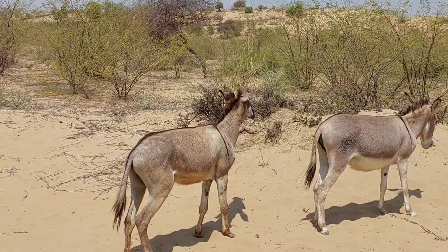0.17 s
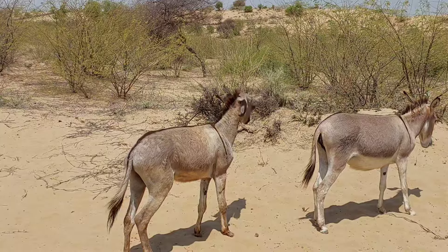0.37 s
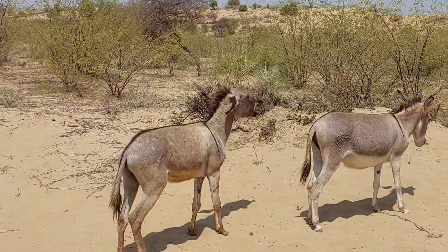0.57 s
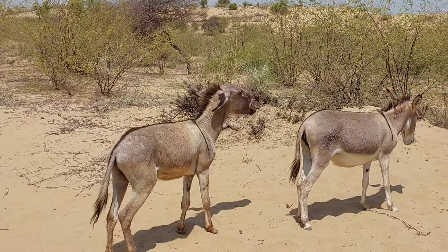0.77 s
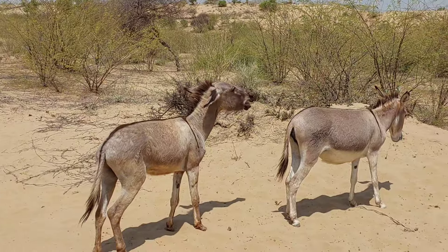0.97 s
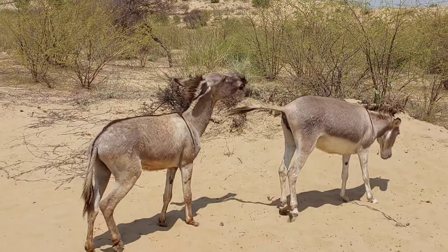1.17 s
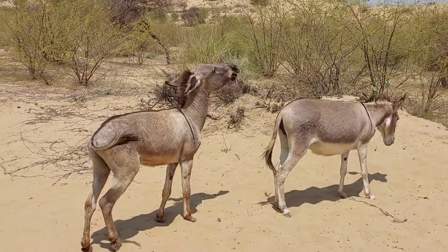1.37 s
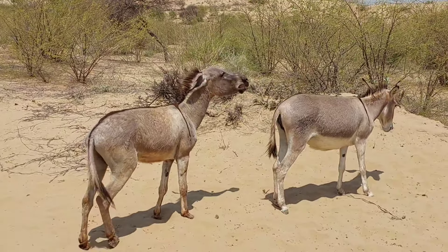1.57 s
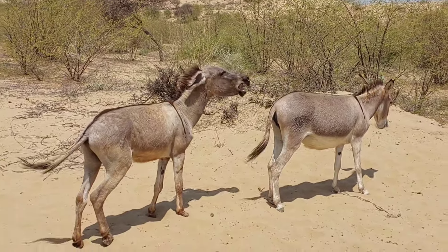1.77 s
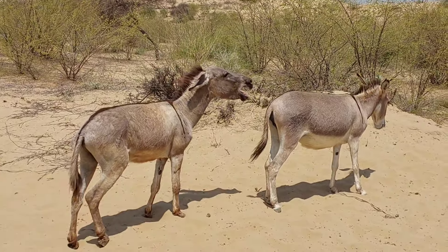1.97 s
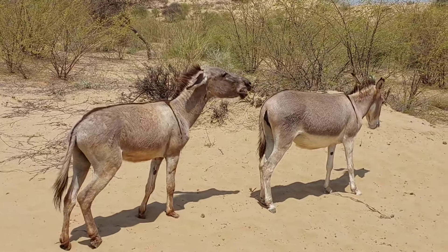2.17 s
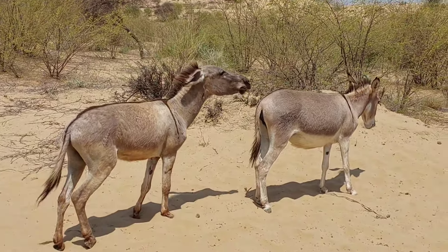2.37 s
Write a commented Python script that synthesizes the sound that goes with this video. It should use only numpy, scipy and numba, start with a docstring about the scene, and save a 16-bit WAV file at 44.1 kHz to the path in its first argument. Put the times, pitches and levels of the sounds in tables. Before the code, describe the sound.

Three quick donkey hee-haws outdoors, each squealing on the in-breath then barking low and harsh; the middle one is loudest and breaks into a rattle. Dry open scrub, very faint echo, gusty stereo microphone, slight high hiss.

```python
"""A donkey brays on open sand: three rounds of a gasp, a squealing in-drawn "hee" and a rough "haw".
Each gasp is noise through mouth resonances; each hee a hoarse whistle with overtones over rushing air.
Two faint moans rise into the first haw. Haws are uneven throat pulses; the second breaks into a rattling
growl, and the third, after one more gasp, rattles out. Throughout, scrub gives a faint echo and wind
buffets the microphone; a faint, high hiss comes and goes, mostly on the right."""
import sys
import numpy as np
from scipy import signal
from scipy.fft import rfft, irfft
from scipy.io import wavfile
from scipy.ndimage import uniform_filter1d
from numba import njit

SR = 44100
rng = np.random.default_rng(int(sys.argv[2]) if len(sys.argv) > 2 else 0)


def materialize(psi):
    """Save the field psi as 16-bit PCM at rate SR to the path in sys.argv[1].

    A 1-D psi becomes a single channel; in a 2-D psi each row is a channel.
    """
    bounded = np.clip(np.atleast_2d(psi).T, -1, 1)
    quanta = np.round(bounded * 32767).astype(np.int16)
    wavfile.write(sys.argv[1], SR, quanta)


N = 112455
T = np.arange(N) / SR

# haw; jitter and rasp scale with roughness
MOUTH_WIDTH_HZ, JITTER, SHIMMER_DB, RASP_GAIN = 120., 0.083, 3.5, 2.54
RATTLE_HZ, RATTLE_JITTER, RATTLE_DECAY_CYCLES = 53.4, .25, 0.35
CATCH_ATTACK_S, CATCH_HOLD_S, CATCH_RELEASE_S = 0.0044, 0.0091, 0.0049
# hee; waver, flicker and flap scale with roughness
WAVER, WAVER_HZ, WAVER_SLOW = 0.037, 500.8, 0.01187
FLICKER_DB, FLICKER_HZ = 8.5, 120.1  # a hoarse whistle catches and drops
FLAP_HZ, FLAP_DEPTH = 489.5, 0.5  # a second, slower oscillation of the folds
FOURTH_DB = -29.5  # against the octave
STRAND_WIDTH_HZ, FLARE_DB, FLARE_HZ, RUSH_DB = 157., 5, 59.76, -1.5
# gasp
GASP_ATTACK_S, GASP_DECAY_S, GASP_RELEASE_S, GASP_SAG_PER_S = 0.022, 0.051, 0.019, 1
GASP_OPEN_S = 0.0096  # the weaker resonances join in as the mouth opens
# surroundings
ECHO_DB, ECHO_T60_S, ECHO_RISE_S = -20, 0.91, 0.0067
BUFFET_DB, BUFFET_HZ = 10.5, 24.535
FLOOR_DB, HISS_LEFT_DB = -54, -28.5  # hiss: left against right
TOP_HZ = 15800


def amp(db):
    """Decibels to gain."""
    return 10 ** (np.asarray(db) / 20)


def unit(x):
    """Scale to rms 1."""
    return x / np.sqrt(np.mean(x ** 2))


def steady(x, size=1300):
    """Hold the running rms near 1; size in samples."""
    power = uniform_filter1d(uniform_filter1d(x ** 2, size), size // 2)
    return x / np.sqrt(power + 1e-12)


def noise():
    """White noise."""
    return rng.standard_normal(N)


def walk(hz):
    """Random wandering of rms 1: straight lines between hz random points per second."""
    return unit(np.interp(T * hz, np.arange(N), noise()))


def curves(rows):
    """The columns of a table over time, and a gate that is open while it lasts."""
    s, *cols = np.array(rows, float).T
    inside = 1. * ((T >= s[0]) & (T <= s[-1]))
    return [np.interp(T, s, c) for c in cols] + [uniform_filter1d(inside, size=200)]


def over_hz(rows, f):
    """The columns of a table over log frequency."""
    hz, *cols = np.array(rows, float).T
    return [np.interp(np.log(f + 1), np.log(hz), c) for c in cols]


def colour(x, points, size=4096):
    """Minimum-phase filter through (Hz, dB) points, built from a folded cepstrum."""
    gain = amp(over_hz(points, np.fft.rfftfreq(size, 1 / SR))[0])
    cepstrum = irfft(np.log(gain))
    cepstrum[1:size // 2] *= 2
    cepstrum[size // 2 + 1:] = 0
    impulse = irfft(np.exp(rfft(cepstrum)))
    return signal.fftconvolve(x, impulse)[:N]


@njit
def resonate(x, hz, width):
    """Band-pass state-variable filter with a moving centre."""
    y, band, low = np.empty(len(x)), 0., 0.
    for i in range(len(x)):
        g, k = np.tan(np.pi * hz[i] / SR), width / hz[i]
        v = (band + g * (x[i] - low)) / (1 + g * (g + k))
        band, low, y[i] = 2 * v - band, low + 2 * g * v, k * v
    return y


def cycles(hz):
    """Cycle count and phase within the cycle."""
    turn = np.cumsum(hz) / SR
    return turn.astype(int), turn % 1


def haw(rows, throat, boost):
    """Uneven vocal pulses and puffs of air ring the throat; a slow flutter chops them into a rattle."""
    hz, db, low_db, mouth_hz, rough, rattle, gate = curves(rows)
    rough, rattle = np.clip(rough, 0, 1), np.clip(rattle, 0, 1)

    count, phase = cycles(hz * np.exp(JITTER * rough * walk(300)))
    shimmer = amp(SHIMMER_DB * np.tanh(noise())[count])
    pulses = unit(np.diff(count, prepend=0) * shimmer)
    soft_close = signal.butter(2, 2200, fs=SR, output="sos")  # the folds close softly
    pulses = signal.sosfilt(soft_close, pulses)
    puffs = unit(noise() * np.exp(-phase / 1.1))
    source = (1 - rough) * pulses + RASP_GAIN * rough * puffs

    voice = colour(source, throat)
    voice = steady(voice + boost * resonate(voice, mouth_hz, MOUTH_WIDTH_HZ))

    flap, flap_phase = cycles(RATTLE_HZ * np.exp(RATTLE_JITTER * walk(50)))
    strokes = np.exp(-flap_phase / RATTLE_DECAY_CYCLES) * amp(3.1 * np.tanh(noise())[flap])
    flutter = unit(uniform_filter1d(strokes, size=130))
    chop = 1 - rattle + rattle * flutter

    fundamental = unit(np.sin(2 * np.pi * phase)) * amp(11.0 * rough * walk(120)) * chop
    return gate * (voice * (chop * amp(db) + catches()) + fundamental * amp(low_db))


def catches():
    """Strength of the short bursts in which the throat snaps open and shuts again."""
    # loudest catches, which stand out of the rattle: t/s, level/dB
    catch_rows = [(1.038, -28.5), (1.095, -26), (1.121, -31.5), (1.138, -30.5), (2.201, -22.5), (2.22, -26),
                  (2.247, -26.5), (2.269, -24.5), (2.295, -27), (2.467, -34.5), (2.493, -36), (2.53, -36)]

    def burst(age):
        release = np.exp(-np.maximum(age - CATCH_HOLD_S, 0) / CATCH_RELEASE_S)
        return np.clip(age / CATCH_ATTACK_S, 0, 1) * release
    return sum(amp(db) * burst(T - start) for start, db in catch_rows)


def hee(rows):
    """In-drawn air whistles in the tight larynx over its own rush; flapping folds add hoarse side tones."""
    # colour of the rushing air: f/Hz, level/dB
    air_colour = [(450, -16), (620, 5.5), (880, 11), (1080, -8.5), (1400, 5.5), (1950, -6), (2600, 9.5),
                  (3700, 0.5), (5800, -1), (6700, -48.5), (8500, -24), (12200, -33)]
    hz, db, octave_db, air_db, rough, gate = curves(rows)
    drift = walk(70)
    flap = np.sin(2 * np.pi * np.cumsum(FLAP_HZ * np.exp(0.17 * walk(90))) / SR)

    def partial(order):
        wobble = rough * (WAVER * walk(WAVER_HZ) / order + WAVER_SLOW * drift)
        tone = np.sin(2 * np.pi * order * np.cumsum(hz * (1 + wobble)) / SR)
        flicker = amp(FLICKER_DB * rough * np.tanh(walk(FLICKER_HZ)))
        return unit(tone * (1 + FLAP_DEPTH * rough * flap) * flicker)

    upper = partial(order=2) + amp(FOURTH_DB) * partial(order=4)
    rush = unit(colour(noise(), air_colour) * amp(2 * walk(120)))
    air = strands(hz) + amp(RUSH_DB) * rush
    return gate * (amp(db) * partial(order=1) + amp(octave_db) * upper + amp(air_db) * air)


def strands(hz):
    """Turbulence rings narrow resonances that glide with the whistle, each flaring on its own."""
    # resonances of the tight larynx: multiple of whistle pitch, level/dB
    strand_rows = [(0.881, -8), (1.01, -4.5), (1.19, -15), (1.53, -14), (1.851, -15), (1.988, -5),
                   (2.098, -7)]

    def ring(centre_hz):
        once = resonate(noise(), centre_hz, STRAND_WIDTH_HZ)
        twice = resonate(once, centre_hz, STRAND_WIDTH_HZ)
        return steady(twice) * unit(amp(FLARE_DB * walk(FLARE_HZ)))
    return sum(amp(db) * ring(multiple * hz) for multiple, db in strand_rows)


def gasp(start, length, db, mouth_hz):
    """A rasp as airflow turns: main mouth resonance first, weaker ones join, all sag in pitch throughout."""
    # resonances: multiple of mouth resonance, nominal width/Hz (widened per stage below), level/dB
    gasp_modes = [(.7, 93, -8.5), (1, 73, 4), (1.4, 62, -5.5), (1.76, 112, -8), (3.2, 360, -26),
                  (4.7, 360, -20.5)]
    age = np.clip(T - start, 0, 2 * length)
    hz = mouth_hz * np.exp(-GASP_SAG_PER_S * (age - length / 2))
    rasp = noise()
    opened = np.clip(2 * age / GASP_OPEN_S - 1, .1, 1)
    ring = 0
    for multiple, width, mode_db in gasp_modes:
        once = resonate(rasp, multiple * hz, 1.3 * width)
        twice = resonate(once, multiple * hz, 1.21 * width)
        ring = ring + amp(mode_db) * (1 if mode_db > -5 else opened) * twice
    shape = np.minimum(age / GASP_ATTACK_S, np.exp(-(age - GASP_ATTACK_S) / GASP_DECAY_S))
    shape = shape * np.clip((length - age) / GASP_RELEASE_S, 0, 1)
    return steady(ring, size=600) * shape * amp(db)


def moan(start, length, from_hz, to_hz, db):
    """A thin, unsteady sine that glides in pitch as it swells and fades."""
    along = np.clip((T - start) / length, 0, 1)
    hz = (from_hz + (to_hz - from_hz) * along) * (1 + 0.042 * walk(65))
    tone = unit(np.sin(2 * np.pi * np.cumsum(hz) / SR) * amp(2.0 * walk(110)))
    return tone * np.sin(np.pi * along) * amp(db)


def ports(x):
    """The call reaches the two microphone ports with different phase and strength."""
    # f/Hz, lead of left/rad, left minus right/dB
    port_rows = [(250, 0.35, -0.5), (731, 0.29, 4), (1190, 1.39, -3), (2795, 1.73, 2.5), (5440, 1.37, -2)]
    lead, db = over_hz(port_rows, np.fft.rfftfreq(2 * N, 1 / SR))
    half = amp(db / 2) * np.exp(.5j * lead)
    return irfft(rfft(x, 2 * N) * np.array([half, 1 / half]))[:, :N]


def scrub(x):
    """Faint scattered echoes from the bushes: decaying noise tails, different on each side."""
    tail = amp(-60 * T / ECHO_T60_S) * np.minimum(T / ECHO_RISE_S, 1)
    tail = tail / np.sqrt(np.sum(tail ** 2))

    def side():
        echo = signal.fftconvolve(x, noise() * tail)[:N]
        return colour(echo, [(1900, -5.5), (5400, -1.0)])
    return np.array([side() for _ in range(2)]) * amp(ECHO_DB)


def background():
    """Coloured noises: wind buffeting each port on its own, a quiet floor, a faint high hiss mostly right."""
    # levels: t/s, level/dB (hiss: right side)
    wind_level, hiss_level = [(.05, -58), (.45, -45), (.78, -39.5), (.87, -50.5), (1.02, -26.5),
                              (1.4, -31.5), (1.9, -39.5), (2.12, -43.5), (2.55, -41.5)], [(.7, -80), (1.02, -60), (1.2, -64), (1.5, -94), (1.85, -46),
                                            (2.1, -71.5)]
    # colours: f/Hz, level/dB
    wind_colour, floor_colour, hiss_colour = [(20, -10.5), (55, 4.5), (170, -9), (400, -21), (2000, -79)], [(40, -5), (420, -18), (800, -9),
                                                                   (1800, -20), (5500, -24.5), (7000, -45)], [(8000, -30.5), (11000, 1),
                                                                                  (15000, 3.5)]

    def gusts():
        air = steady(colour(noise(), wind_colour), size=2500)
        return air * unit(amp(BUFFET_DB * np.tanh(walk(BUFFET_HZ))))
    wind = np.array([gusts() for _ in range(2)])
    floor = np.array([unit(colour(noise(), floor_colour)) for _ in range(2)])
    hiss = np.array([unit(colour(noise(), hiss_colour)) * amp(db) for db in (HISS_LEFT_DB, 0)])
    return wind * amp(curves(wind_level)[0]) + floor * amp(FLOOR_DB) + hiss * amp(curves(hiss_level)[0])


def scene():
    """The bray, its echo, wind, and background noise with a faint high hiss, mostly right."""
    # haws: t/s, pitch f/Hz, level/dB, fundamental level/dB, mouth resonance f/Hz, roughness 0-1, rattle 0-1
    haw_1, haw_2, growl, haw_3 = [(.364, 170, -42, -58.5, 830, 0.21, 0.1),
                                  (.38, 170.3, -25, -33, 845, 0.24, 0),
                                  (.42, 185.7, -17, -27.5, 875, 0.24, 0.13),
                                  (.44, 208.1, -24, -29.5, 964, 0.42, 0),
                                  (.455, 280.5, -18.5, -28, 1020, 0.26, 0.4),
                                  (.477, 296.1, -14, -28, 1053, 0.16, 0),
                                  (.505, 310, -36, -64.5, 950, 0.4, 0.09)], [(.874, 204.6, -56.5, -89, 886, 0.27, 0),
                                                 (.885, 232.5, -25, -53, 980, 0.29, 0),
                                                 (.915, 297.6, -12.5, -32, 1194, 0.29, 0),
                                                 (.99, 285.4, -16.5, -36, 1188, 0.43, 0),
                                                 (1.05, 265.7, -24.5, -43.5, 880, 0.46, 0.076),
                                                 (1.115, 240.8, -33, -56, 794, 0.35, 0.42),
                                                 (1.185, 219.8, -52.5, -46, 666, 0.55, 1)], [(1.15, 215.3, -51.5, -70.5, 706, 0.88, 1),
                                                                (1.47, 195.7, -42, -63, 597, 0.48, 0.63),
                                                                (1.71, 181.7, -49.5, -47, 510, 0.75, 0.49)], [(2.135, 205, -58.5, -66.5, 630, 0.073, 0),
                                                                               (2.16, 207.7, -29, -61, 600, 0.2, 0.17),
                                                                               (2.23, 226, -24.5, -48, 617, 0.41, 0),
                                                                               (2.3, 232.3, -32.5, -48, 692, 0.37, 0.58),
                                                                               (2.38, 222.5, -41, -45.5, 677, 0.37, .9),
                                                                               (2.56, 245.8, -35.5, -34, 730, 0.21, 0.97)]
    # colour of the throat in each haw: f/Hz, level/dB
    throat_1, throat_2 = [(300, -13.5), (420, -16), (590, -4.5), (700, -2.5), (850, -2.5), (1100, -0.5),
                          (1450, -19.5), (1730, -6), (2000, -19.5), (2700, -27), (3170, -22), (3700, -34),
                          (5400, -27), (7000, -53)], [(300, -10), (400, -11.5), (590, 3.5), (900, 2), (1220, 4),
                                            (1470, -11.5), (1700, -1), (1950, -11), (2900, -27),
                                            (3700, -30.5), (4300, -24), (5700, -27.5), (7000, -57.5)]
    throat_growl, throat_3 = [(400, -9), (560, 3.5), (850, -3), (1300, -7.5), (1620, -16), (1950, -43.5),
                              (2500, -18), (5600, -23), (7000, -50)], [(260, -5), (390, -17.5), (530, 1), (700, 4.5),
                                                    (930, -2.5), (1080, -11), (1480, -10.5), (1800, -21.5),
                                                    (2250, -25.5), (2520, -11), (2800, -25.5), (3350, -15),
                                                    (3700, -27), (6000, -36), (7200, -53.5)]
    # hees: t/s, pitch f/Hz, whistle level/dB, octave level/dB, rushing air level/dB, roughness 0-1
    hee_1, hee_2, hee_3 = [(.118, 2683, -67.5, -61.5, -50, 0.04), (.16, 2720, -29.5, -43.5, -36.5, 0.37),
                           (.21, 2694, -37.5, -29.5, -35.5, 0.72), (.29, 2700, -34, -40, -42.5, 0.5),
                           (.325, 2700, -65.5, -42.5, -48.5, 0.26)], [(0.609, 2557, -57.5, -46, -70.5, 0.598),
                                          (0.637, 2668, -28, -41, -35.5, 0.67),
                                          (0.669, 2749, -28, -29, -37.5, 0.73),
                                          (0.791, 2607, -49.5, -54.5, -41.5, 0.57),
                                          (0.821, 2660, -78, -74, -45.5, 0.87)], [(1.804, 2640, -46.5, -52, -45.5, .3),
                                                         (1.846, 2731, -27.5, -36.5, -35, 0.36),
                                                         (1.877, 2732, -29, -27.5, -38, 0.47),
                                                         (1.903, 2710, -36.5, -18.5, -35, .04),
                                                         (1.931, 2654, -50, -26, -38.5, 0.054),
                                                         (1.942, 2690, -57, -53, -36.5, 0.75),
                                                         (2.066, 2625, -54.5, -86, -52.5, 1)]
    # gasps: t/s, length/s, level/dB, mouth resonance f/Hz
    gasp_rows = [(0.042, 0.11, -28, 910), (0.551, 0.072, -30.5, 873), (1.726, 0.072, -27.5, 844),
                 (2.003, 0.068, -31.5, 865)]
    # moans: t/s, length/s, start f/Hz, end f/Hz, level/dB
    moan_rows = [(0.223, 0.13, 294.4, 434, -53.5), (0.244, 0.13, 876, 968, -45)]

    bray = haw(haw_1, throat_1, boost=1.84) + haw(haw_2, throat_2, boost=1.84)
    bray = bray + haw(growl, throat_growl, boost=1.84)
    bray = bray + haw(haw_3, throat_3, boost=1.2)  # the mouth rings less in the last haw
    bray = bray + sum(hee(rows) for rows in (hee_1, hee_2, hee_3))
    bray = bray + sum(gasp(*row) for row in gasp_rows)
    bray = bray + sum(moan(*row) for row in moan_rows)
    return ports(bray) + scrub(bray) + background()


def record(dry):
    """The recorder cuts the top with a steep elliptic low-pass."""
    return signal.sosfilt(signal.ellip(10, .2, 80, TOP_HZ, fs=SR, output="sos"), dry)


dry = scene()
out = record(dry)
materialize(out)
```